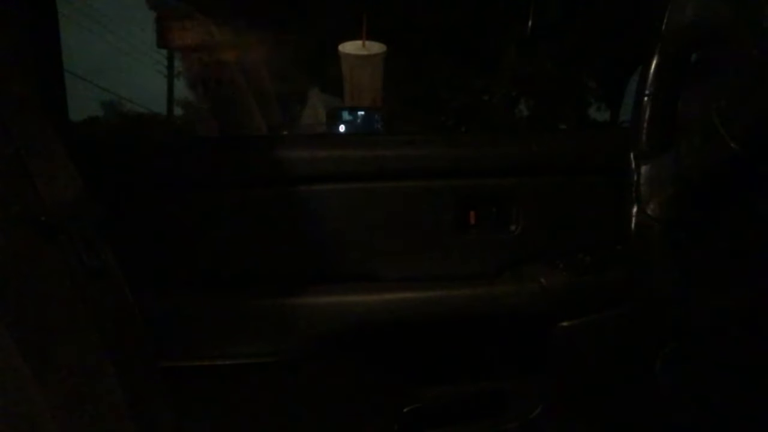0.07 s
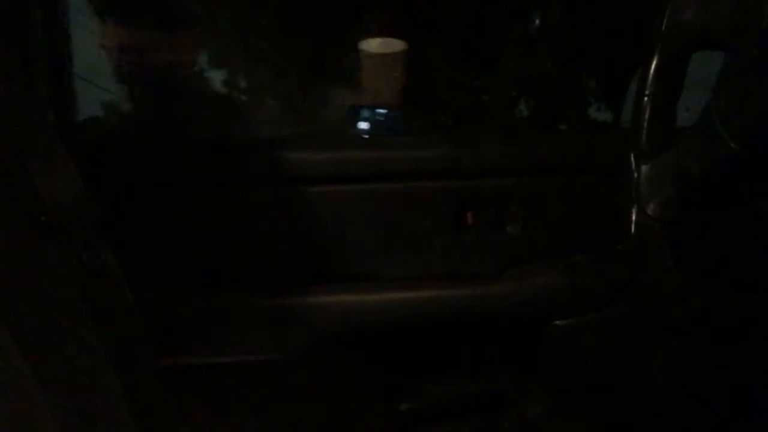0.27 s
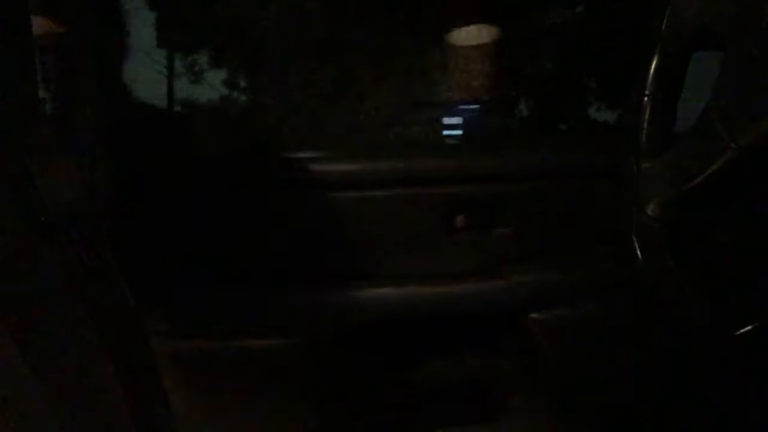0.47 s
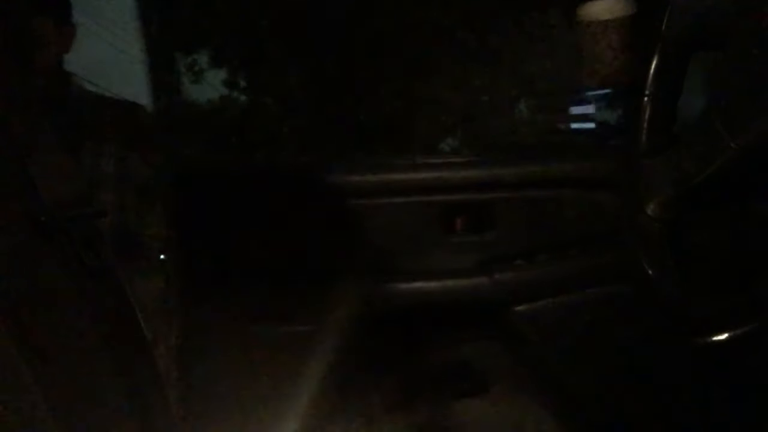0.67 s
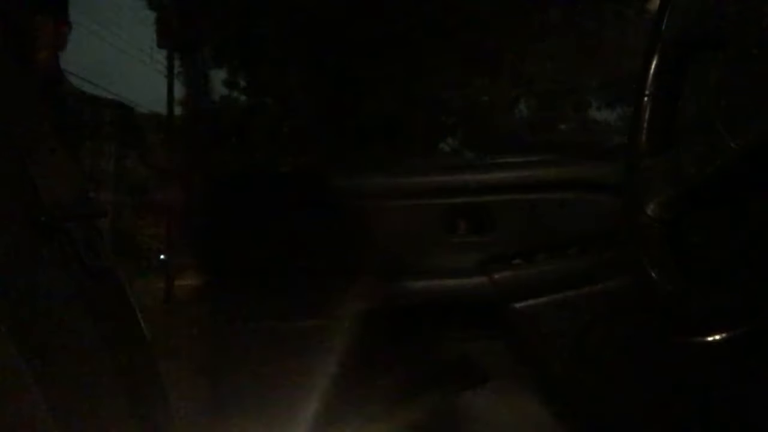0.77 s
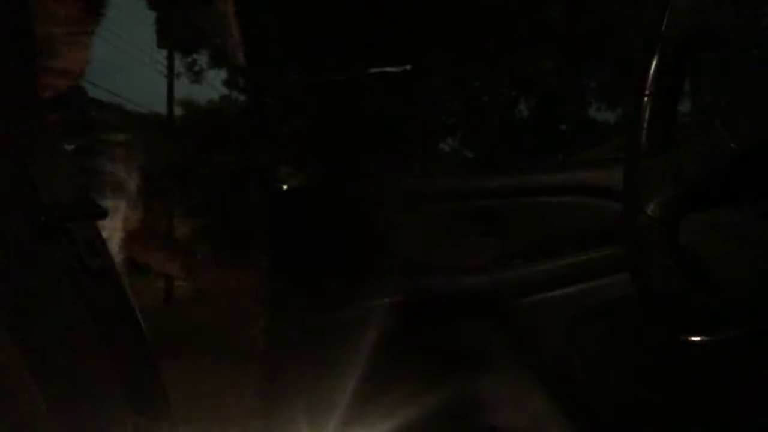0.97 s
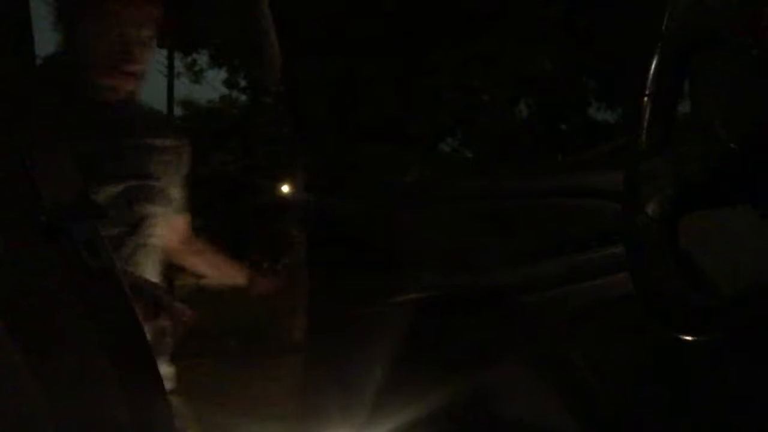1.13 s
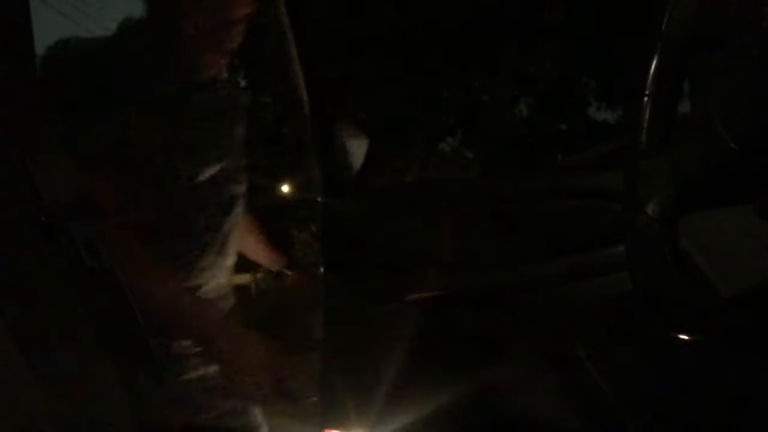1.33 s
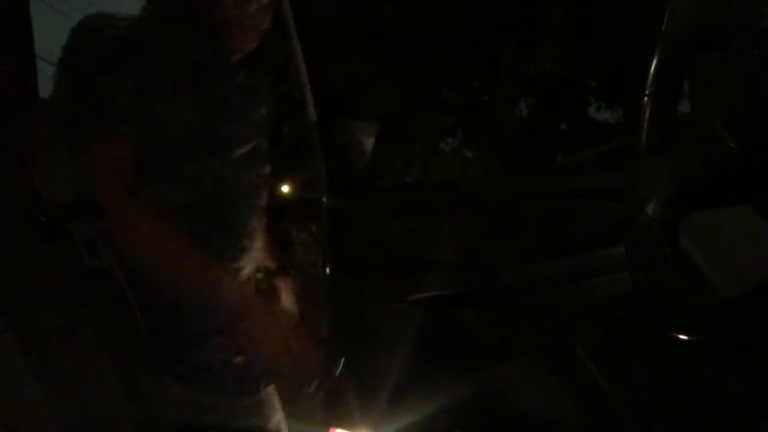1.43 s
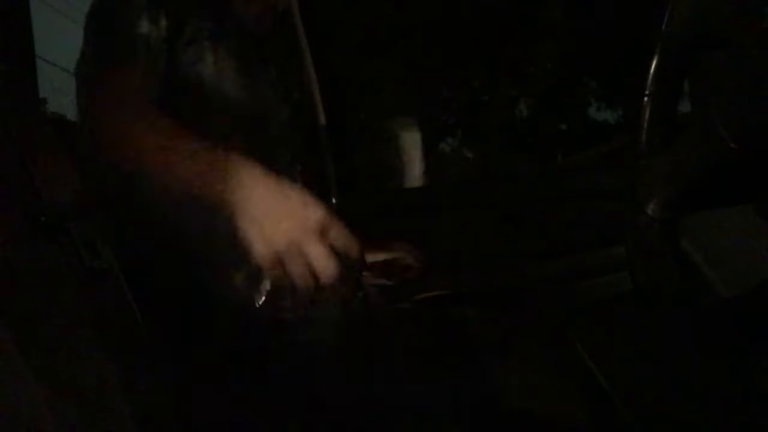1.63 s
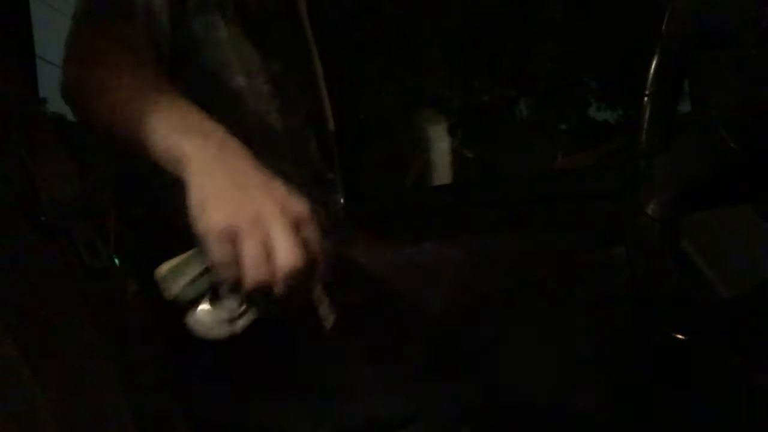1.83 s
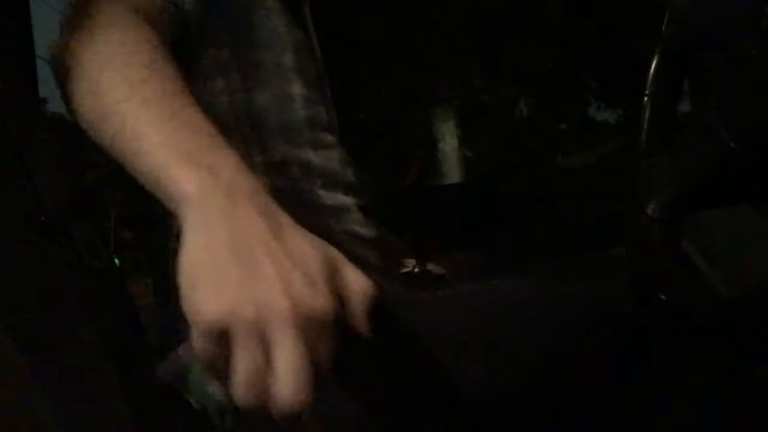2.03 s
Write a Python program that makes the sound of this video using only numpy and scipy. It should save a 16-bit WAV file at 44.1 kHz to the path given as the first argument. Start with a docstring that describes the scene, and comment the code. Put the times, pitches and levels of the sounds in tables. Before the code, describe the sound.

A car door latches and shuts with a thump that booms inside the parked car. Keys jingle in short bursts among rustles and soft knocks, then a hard object clicks sharply. The hand-held microphone rumbles.

```python
"""Inside a parked car, a door touches its latch and shuts with a thump that booms in the cabin.
Someone moves about with a bunch of keys: they strike each other and jingle in short bursts.
Clothes rustle, things knock on the trim, rub with a squeak or ring hollow, and near the end
a hard object clicks sharply and bounces. The hand-held microphone rumbles over a faint hiss."""
import sys
import numpy as np
from scipy import signal
from scipy.fft import rfft, irfft
from scipy.io import wavfile
from scipy.ndimage import uniform_filter1d

SR = 44100
rng = np.random.default_rng(int(sys.argv[2]) if len(sys.argv) > 2 else 0)


def to_wav(sig):
    """Store sig (one row per channel, or 1-D mono) as 16-bit WAV at the path in sys.argv[1].

    Samples outside -1..1 are clipped; the rate is SR.
    """
    pcm = np.clip(np.atleast_2d(sig), -1, 1) * 32767
    pcm = np.round(pcm).astype(np.int16)
    wavfile.write(sys.argv[1], SR, pcm.T)  # frames by channels


N = 92610
T = np.arange(N) / SR


def amp(db):
    """Turn decibels into a number to multiply by."""
    return 10 ** (np.asarray(db) / 20)


def unit(x):
    """Scale a sound to an average power of 1."""
    return x / np.sqrt(np.mean(x ** 2) + 1e-20)


def add(out, start, x):
    """Mix a sound in at its start time, in seconds."""
    i = int(np.clip(start * SR, 0, N - 1))
    out[i:i + len(x)] += x[:N - i]


def through(x, response):
    """Pass a sound through an object, given how that object answers one tap."""
    return signal.fftconvolve(x, response)[:len(x)]


def colour(points, size=2048):
    """Make a tap of energy 1 whose low and high tones are as strong as the table says."""
    hz, db = np.array(points).T
    f = np.maximum(np.arange(size // 2 + 1) * SR / size, 1)
    gain = amp(np.interp(np.log(f), np.log(hz), db))
    cepstrum = irfft(np.log(gain))
    # folding this in half packs the energy at the start of the tap
    cepstrum[1:size // 2] *= 2
    cepstrum[size // 2 + 1:] = 0
    response = irfft(np.exp(rfft(cepstrum)))
    return response / np.linalg.norm(response)


def ring(modes, size=22050):
    """The notes of a tapped object; each fades by 60 dB in its ring time, t60."""
    t = T[:size]
    return sum(amp(db) * np.sin(2 * np.pi * hz * t) * np.exp(-np.log(1000) * t / t60)
               for hz, db, t60 in modes)


def vary(modes, detune, scatter_db):
    """No two strikes ring alike: the pitch and strength of each note shift a little."""
    chance = rng.standard_normal((len(modes), 2))
    return [(hz * (1 + detune * a), db + scatter_db * b, t60)
            for (hz, db, t60), (a, b) in zip(modes, chance)]


def swell(rise, fade):
    """A loudness shape that climbs in a straight line, then dies away."""
    t = T[:int((rise + 8 * fade) * SR) + 2]
    return np.minimum(t / rise, 1) * np.exp(-np.maximum(t - rise, 0) / fade)


def grains(shape, spread_db, size=32768):
    """Many tiny touches of uneven strength that follow a loudness shape."""
    noise, strength = rng.standard_normal((2, size))
    uneven = amp(spread_db * np.repeat(strength, 16)[:size])
    return shape * np.resize(noise * uneven, len(shape))


def fill(x, shape):
    """Give a sound the same energy as its loudness shape."""
    return x * np.linalg.norm(shape) / (np.linalg.norm(x) + 1e-20)


def burst(shape, body, spread_db):
    """A puff of noise: tiny touches heard through an object."""
    return fill(through(grains(shape, spread_db), body), shape)


def push(length):
    """A soft shove: half a sine wave that adds up to 1."""
    force = np.sin(np.pi * np.minimum(T[:SR // 20] / length, 1))
    return force / force.sum()


# how loud the rumble is over time: t/s, level/dB
RUMBLE_LEVEL = [(0, -41), (.11, -91), (.13, -66), (.17, -45), (.29, -37.5), (.36, -34.5), (.44, -42.5),
                (.58, -46), (.72, -53), (.94, -57), (1.02, -49.5), (1.14, -44.5), (1.23, -49), (1.3, -51),
                (1.5, -57), (1.7, -65), (1.8, -41), (1.92, -54), (2.1, -46)]
# tone colour of the rumble: f/Hz, level/dB
RUMBLE_COLOUR = [(12, -32), (30, -7), (45, -2), (58, 1.5), (80, 0), (110, -8.5), (160, -33), (330, -27.5),
                 (500, -42.5), (1500, -64)]
def rumble():
    """A hand holding the microphone makes a deep noise that comes and goes."""
    low = through(rng.standard_normal(N), colour(RUMBLE_COLOUR, size=16384))
    low /= np.sqrt(uniform_filter1d(low ** 2, size=3500))  # even out chance swells
    return low * amp(np.interp(T, *np.array(RUMBLE_LEVEL).T))


# how loud the hiss is over time: t/s, level/dB
HISS_LEVEL = [(0, -65), (.15, -67.5), (.36, -60), (.58, -58), (.8, -61.5), (.88, -57), (1.0, -61),
              (1.1, -58.5), (1.25, -60), (1.34, -58), (1.52, -60.5), (1.8, -57.5), (2.1, -56.5)]
# tone colour of the hiss: f/Hz, level/dB
HISS_COLOUR = [(40, 9), (150, 10), (400, -3.5), (900, -1), (1500, -5.5), (3000, -10), (7000, -16),
               (9500, -27), (15500, -28)]
def hiss():
    """Faint noise that drifts up and down in level."""
    noise = through(rng.standard_normal(N), colour(HISS_COLOUR))
    return noise * amp(np.interp(T, *np.array(HISS_LEVEL).T))


def hum(hz=74, db=-53.5, end_s=0.12, fade_s=0.008):
    """A low note that stops just before the door shuts."""
    return amp(db) * unit(np.sin(2 * np.pi * hz * T)) * np.clip((end_s - T) / fade_s, 0, 1)


# the door hits latch and frame: t/s, level/dB, rise/s, fade/s, latch ring above the hit/dB
DOOR_HITS = [(0.15, -54, 0.016, 0.022, -9), (.178, -31.5, 0.0049, 0.0075, -33),
             (0.186, -35, 0.0015, 0.014, -30), (0.217, -39.5, 0.0015, 0.0068, -3),
             (0.2227, -29, 0.0043, 0.013, 7), (.246, -46, 0.0022, 0.014, 4),
             (0.276, -52, 0.0042, 0.025, -10), (0.3415, -50.5, 0.00087, 0.0048, -1)]
# tone colour of those hits: f/Hz, level/dB
DOOR_HIT_COLOUR = [(100, -11), (200, 4.5), (350, 8.5), (600, -6.5), (1000, -8.5), (1600, -8), (2100, 1.5),
                   (2800, -4.5), (3500, -13), (5500, -23), (8000, -30), (15000, -62)]
# notes of the latch: f/Hz, level/dB, ring time/s
LATCH_NOTES = [(1212, -5, 0.05), (1300, 2.5, 0.06), (1335, -7, 0.035)]
# air pushed ahead of the closing door: t/s, level/dB, push length/s
DOOR_AIR = [(0.184, -30.5, 0.0041), (0.201, -23.5, 0.0051), (0.2186, -15, 0.0038)]
# tone colour of the shuddering panels: f/Hz, level/dB
SHUDDER_COLOUR = [(35, -25.5), (65, 1), (120, 9.5), (200, -2), (330, -8.5), (500, -11.5), (750, -18.5),
                  (1000, -14.5), (1600, -22.5), (3000, -41), (8000, -62)]
# deep notes of the boom: f/Hz, level/dB, ring time/s
BOOM_NOTES = [(35.4, -17, 0.33), (57.4, -9, 0.17), (75.9, 1, 0.13), (89, -1, 0.078), (132, -7, 0.13),
              (198, -7.5, 0.062), (323.5, -13, 0.3), (345.2, -9, 0.41)]
def door(shut_s=.2295):
    """The latch catches and rings, the door lands, the cabin booms and the panels shudder."""
    out, force = np.zeros((2, N))
    crack, latch = colour(DOOR_HIT_COLOUR), ring(LATCH_NOTES)
    for start, db, rise, fade, latch_db in DOOR_HITS:
        shape = swell(rise, fade)
        add(out, start, amp(db) * burst(shape, crack, spread_db=2.6))
        strike = grains(shape ** 4, spread_db=4.5)  # shorter than the hit itself
        add(out, start, amp(db + latch_db) * fill(through(strike, latch), shape))
    for start, db, length in DOOR_AIR:
        add(force, start, amp(db) * push(length))
    add(force, shut_s, amp(-9) * push(0.0036))  # the door lands
    shudder = burst(swell(rise=0.0056, fade=0.038), colour(SHUDDER_COLOUR), spread_db=1.5)
    add(out, shut_s, amp(-24.5) * shudder)
    return out + through(force, ring(BOOM_NOTES))


# keys touch each other: t/s, level/dB, f/Hz, rattle fade/s, tick above the touch/dB
KEY_TOUCHES = [(0.2902, -55, 3230, 0.0042, 8), (0.3411, -53.5, 3080, 0.0029, 3),
               (0.676, -53, 3300, 0.015, 12), (0.6832, -43, 4500, 0.0061, -1),
               (0.687, -43.5, 4030, 0.0058, 2.5), (0.7163, -54, 3500, 0.016, 5),
               (0.752, -51, 4200, 0.0091, -13), (0.8398, -70.5, 3450, 0.013, 8),
               (0.8478, -45.5, 3160, 0.0068, -21), (0.8712, -55, 3240, 0.016, -12),
               (.883, -55, 4100, 0.0061, -16), (0.908, -57, 4260, 0.0049, 4),
               (0.9406, -46, 2900, 0.011, -8), (0.955, -32.5, 3220, 0.0048, -15.5),
               (0.964, -42, 3200, 0.0033, -7), (1.121, -46.5, 3330, 0.021, -11),
               (1.1303, -32.5, 3310, 0.003, -8), (1.1337, -36.5, 3250, 0.0093, -4),
               (1.146, -35.5, 3240, 0.0075, -8.5), (1.161, -40, 2970, 0.0037, -9),
               (1.1755, -43.5, 3140, 0.008, -7), (1.1866, -44, 4030, 0.005, 2),
               (1.191, -40.5, 3170, 0.0044, -10), (1.2162, -37, 3340, 0.0058, -9),
               (1.2315, -46.5, 3450, 0.008, -5), (1.2786, -32, 3590, 0.0027, -18.5),
               (1.2812, -40, 3420, 0.0054, -19), (1.3338, -56, 4100, 0.018, -2.5),
               (1.355, -53, 3660, 0.0059, 4.5), (1.3765, -48.5, 4080, 0.0058, 1),
               (1.398, -54.5, 5260, 0.0031, 5.5), (1.431, -39, 3820, 0.007, -4.5),
               (1.4426, -25, 3050, 0.0048, -21), (1.453, -40, 3300, 0.0025, -18),
               (1.6893, -46, 2930, 0.0016, 3), (1.709, -48.5, 4280, 0.0022, 5),
               (1.797, -48, 3470, 0.0034, 3), (1.867, -41.5, 3100, 0.0063, -1.5),
               (1.88, -51, 3370, .003, 7), (1.9522, -48.5, 3780, 0.0021, 1.5),
               (2.0425, -47.5, 4200, 0.00077, 2)]
# tone colour of the bright tick: f/Hz, level/dB
TICK_COLOUR = [(200, -66), (1200, -14), (1800, 1), (2600, 4.5), (3300, 14), (4200, 6), (4900, -8),
               (5600, 5), (6400, -5), (7400, 0), (9000, -5), (10500, -13), (15500, -12.5)]
# notes of the whole bunch: f/Hz, level/dB, ring time/s
BUNCH_NOTES = [(2900, -4, .03), (3230, 0, .04), (3520, -2, .035), (4250, -5, .03), (5320, -10, .03),
               (5900, -12, .025), (7300, -12, .02)]
def key_rattle(size=6000, width_hz=560):
    """Each touch is a strike and a quick rattle: one key sounds its pitch, the bunch rings faintly."""
    out, t = np.zeros(N), T[:size]
    tick = colour(TICK_COLOUR)
    soften = signal.butter(1, 10000, fs=SR, output="sos")
    for start, db, hz, fade, tick_db in KEY_TOUCHES:
        shape = np.exp(-t / fade)
        touches = unit(grains(np.ones(size), spread_db=5)) * shape
        touches[0] += 2.6  # the first strike
        touches = signal.sosfilt(soften, touches)
        key = np.sin(2 * np.pi * hz * t) * t * np.exp(-np.pi * width_hz * t)
        bunch = ring(vary(BUNCH_NOTES, detune=.035, scatter_db=4), size=size)
        for body, part_db in [(key, -1), (tick, tick_db), (bunch, -10)]:
            add(out, start, amp(db + part_db) * fill(through(touches, body), shape))
    return out


# rustles and key scrapes: t/s, level/dB, rise/s, fade/s
CRACKLES = [(.595, -58, 0.018, 0.088), (.683, -50, 0.0029, 0.0098), (0.8733, -48.5, 0.0023, 0.02),
            (0.949, -48, 0.004, 0.0044), (1.044, -57.5, 0.0011, 0.0089), (1.078, -60, 0.0089, 0.044),
            (1.442, -41, 0.0018, 0.0066), (1.645, -54.5, 0.003, 0.013), (1.658, -51.5, 0.0054, 0.011),
            (1.677, -52, 0.0018, 0.0049), (1.6818, -42, 0.00062, 0.0037), (1.6896, -42.5, .0007, 0.0099),
            (1.706, -43.5, 0.002, 0.012), (1.762, -58.5, 0.002, 0.13)]
# tone colour of their crackle: f/Hz, level/dB
CRACKLE_COLOUR = [(300, -2), (900, -12.5), (1400, -3.5), (2800, 1), (4300, 2), (5200, -6.5), (7000, -10),
                  (10000, -21), (15500, -33)]
def crackles():
    """Short swells of fine crackle: rustling, and the scrape of the loudest key clinks."""
    out, body = np.zeros(N), colour(CRACKLE_COLOUR)
    for start, db, rise, fade in CRACKLES:
        add(out, start, amp(db) * burst(swell(rise, fade), body, spread_db=5))
    return out


# knocks on trim and seat: t/s, boom level/dB, push length/s, clatter level/dB, clatter fade/s
KNOCKS = [(.607, -55, 0.0022, -53, 0.029), (0.633, -42.5, 0.0039, -63, 0.026),
          (0.956, -48, 0.0016, -44, 0.015), (0.981, -52, 0.0017, -76, .01),
          (1.072, -39.5, 0.0076, -55.5, 0.058), (1.552, -81, 0.0013, -45, 0.019),
          (1.7448, -45, 0.0018, -34.5, 0.01), (1.749, -33, 0.0039, -46, 0.019),
          (1.768, -41.5, 0.0048, -74, 0.013), (1.815, -39, 0.0053, -64, 0.012),
          (1.972, -56, 0.0025, -46.5, 0.011), (2.012, -31.5, 0.0094, -57, 0.016),
          (2.0245, -29.5, 0.0081, -59, 0.025), (2.068, -61, 0.0026, -54, 0.022)]
# low notes of the trim, the panels that line the car: f/Hz, level/dB, ring time/s
TRIM_NOTES = [(84.3, 6, 0.11), (109.5, 0, 0.29), (156.5, -6.5, 0.16), (228.6, -2.5, 0.17)]
# tone colour of the clatter: f/Hz, level/dB
CLATTER_COLOUR = [(80, 11), (200, 5), (380, -2), (560, -10.5), (760, -2.5), (960, 1), (1300, -7.5),
                  (2000, -4), (3000, -9.5), (4500, -19.5), (8000, -26), (15000, -54)]
def knocks():
    """Soft bumps make the trim boom, each with a short clatter."""
    out, force = np.zeros((2, N))
    clatter = colour(CLATTER_COLOUR)
    for start, boom_db, length, clatter_db, fade in KNOCKS:
        add(force, start, amp(boom_db) * push(length))
        add(out, start, amp(clatter_db) * burst(swell(0.0013, fade), clatter, spread_db=0.51))
    return out + through(force, ring(TRIM_NOTES))


# notes of two keys that hang free: f/Hz, level/dB, ring time/s
BRIGHT_KEY = [(3090, -7, .1), (3300, 0, .09), (3450, -3, .11), (4360, -11, .17), (5276, -19, .17),
              (6223, -17, .11), (7680, -17, .08), (9028, -17, .06)]
MELLOW_KEY = [(3200, 0, .1), (3235, -5, .14), (3700, -11, .09), (4210, -6, .1), (5286, -9, .11),
              (5520, -11, .07)]
# those keys are struck: t/s, level/dB, which key
KEY_CHIMES = [(.7135, -43.5, BRIGHT_KEY), (.728, -50, BRIGHT_KEY), (.751, -56, BRIGHT_KEY),
              (.846, -46.5, MELLOW_KEY), (.870, -45.5, MELLOW_KEY), (0.881, -46.5, MELLOW_KEY)]
def key_chimes(rise_s=.005):
    """Keys that hang free ring on clearly after they are struck."""
    out = np.zeros(N)
    for start, db, notes in KEY_CHIMES:
        chime = ring(vary(notes, detune=.008, scatter_db=3))
        add(out, start, amp(db) * chime * np.minimum(T[:len(chime)] / rise_s, 1))
    return out


def jingle():
    """Rattle and chimes together; such small pieces of metal give off little bass."""
    bass_cut = signal.butter(3, 2400, "high", fs=SR, output="sos")
    return signal.sosfilt(bass_cut, key_rattle() + key_chimes())


# things rub together: t/s, level/dB, f/Hz, rise/s, fade/s
SQUEAKS = [(0.769, -49.5, 399, 0.0054, 0.021), (0.796, -53.5, 356, 0.0094, 0.02),
           (0.769, -63.5, 963, 0.004, 0.022), (1.058, -52.5, 780, 0.0093, 0.014),
           (1.355, -56, 1294, 0.0033, 0.013), (1.377, -46.5, 1254, 0.0065, 0.013)]
def squeaks(wobble=.04):
    """Rubbing makes brief tones with an unsteady pitch."""
    out = np.zeros(N)
    for start, db, hz, rise, fade in SQUEAKS:
        shape = swell(rise, fade)
        wander = unit(uniform_filter1d(rng.standard_normal(N), size=150))[:len(shape)]
        pitch_hz = hz * (1 + wobble * wander)
        tone = np.sin(2 * np.pi * np.cumsum(pitch_hz) / SR)
        add(out, start, amp(db) * shape * unit(tone))
    return out


# taps on hollow objects: t/s, level/dB, f/Hz, ring time/s
HOLLOW_TAPS = [(1.131, -48, 1272, 0.091), (1.442, -41.5, 1280, 0.084), (1.69, -48.5, 1272, 0.074),
               (1.746, -33, 963, .045)]
def hollow_taps():
    """A hollow object rings with one short note when something knocks against it."""
    out = np.zeros(N)
    for start, db, hz, t60 in HOLLOW_TAPS:
        add(out, start, ring([(hz, db, t60)]))
    return out


# a hard object clicks and bounces: t/s, level/dB, crack above the click/dB
CLICKS = [(1.847, -12.5, -13.5), (1.8533, -25, -16), (1.8624, -20, -7)]
# notes of its thin ring: f/Hz, level/dB, ring time/s
CLICK_NOTES = [(1270, -31, .1), (3262, -32, .1), (4342, -36, .19)]
# tone colours of its clean snap and its noisy crack: f/Hz, level/dB
SNAP_COLOUR = [(300, -62), (700, -27), (1100, -15.5), (1350, -32), (1600, -38), (2300, -24), (2750, 0),
               (3150, 3), (3900, -8.5), (4250, -5.5), (4700, -17.5), (5800, -15.5), (6300, -35),
               (7000, -37), (10000, -34.5), (15500, -36)]
CRACK_COLOUR = [(300, -24), (2000, -6.5), (3000, 12), (5700, -4.5), (6400, -9), (7500, -3), (10000, -21),
                (13200, -35), (15500, -34)]
def clicks(tone_hz=3206, tone_db=-6.5, ring_s=.008):
    """A hard object strikes: a snap, a strong tone that dies fast, a thin metal ring and a crack."""
    out, crack, snap = np.zeros(N), colour(CRACK_COLOUR), colour(SNAP_COLOUR)
    tone = ring([(tone_hz, tone_db, ring_s)])
    tone *= np.minimum(T[:len(tone)] * tone_hz, 1)  # fade in over one wave
    click = tone + ring(CLICK_NOTES)
    shape = swell(rise=.0001, fade=.0014)
    for start, db, crack_db in CLICKS:
        add(out, start, amp(db) * snap / np.abs(snap).max())
        add(out, start, amp(db) * click)
        add(out, start, amp(db + crack_db) * burst(shape, crack, spread_db=2.9))
    return out


def cabin(x, size=6000, echo_db=-18.5, ring_s=.064):
    """Glass and trim add many quick echoes; the bass passes as it is."""
    t = T[:size]
    echoes = rng.standard_normal(size) * np.exp(-np.log(1000) * t / ring_s) * (t > .002)
    echoes = signal.sosfilt(signal.butter(2, 400, "high", fs=SR, output="sos"), echoes)
    return x + amp(echo_db) * through(x, echoes / np.linalg.norm(echoes))


def scene():
    """The background plus all the sounds that echo in the cabin, in one channel."""
    background = rumble() + hiss() + hum()
    events = door() + knocks() + jingle() + hollow_taps() + clicks() + crackles() + squeaks()
    return (background + cabin(events))[None]


def record(dry):
    """The recorder cuts the deepest bass and the highest treble."""
    bass_cut = signal.butter(3, 28, "high", fs=SR, output="sos")
    treble_cut = signal.ellip(10, .1, 80, 15900, fs=SR, output="sos")
    return signal.sosfilt(treble_cut, signal.sosfilt(bass_cut, dry))


dry = scene()
out = record(dry)
to_wav(out)
```